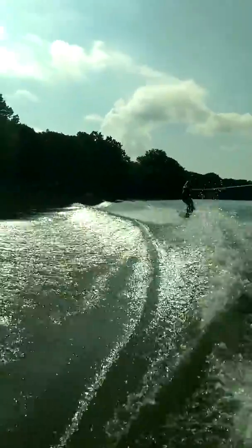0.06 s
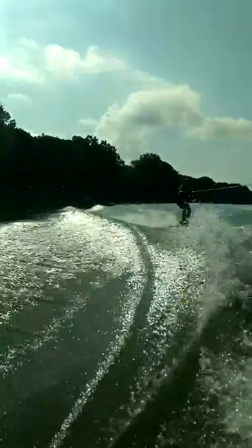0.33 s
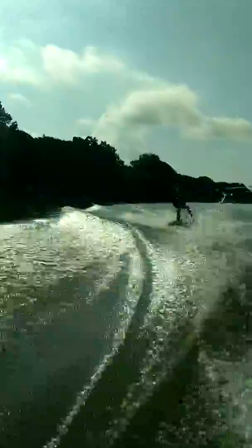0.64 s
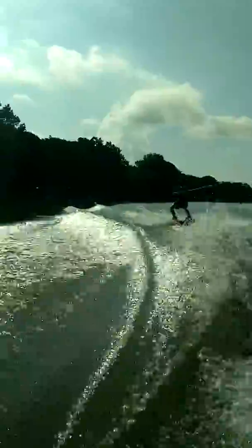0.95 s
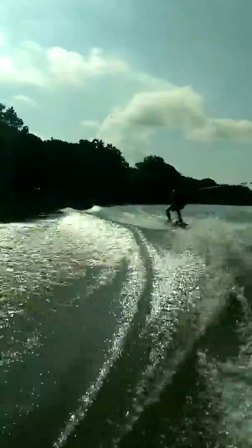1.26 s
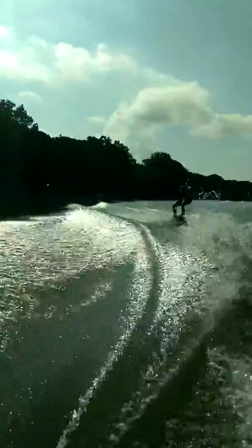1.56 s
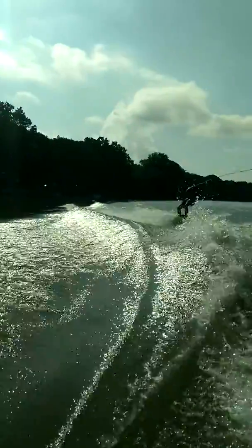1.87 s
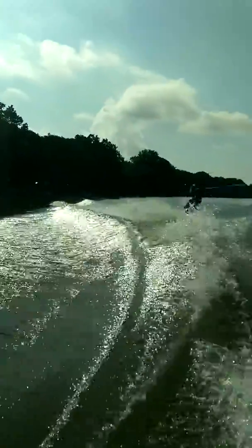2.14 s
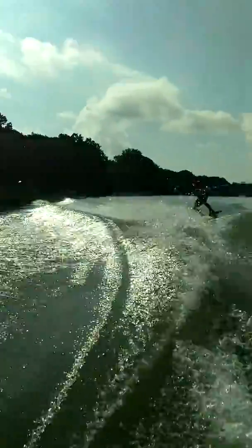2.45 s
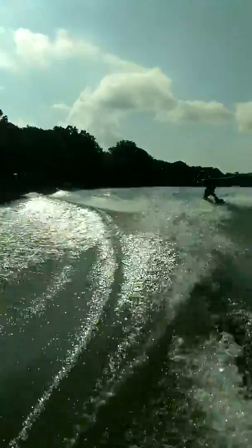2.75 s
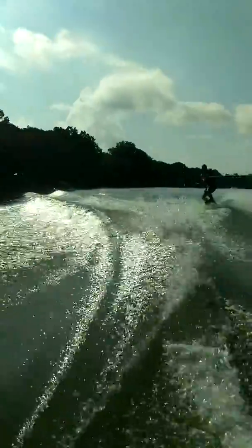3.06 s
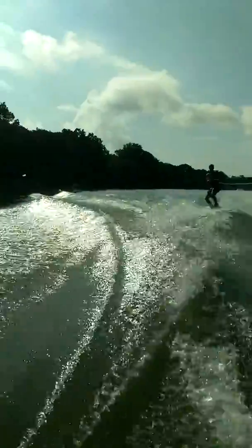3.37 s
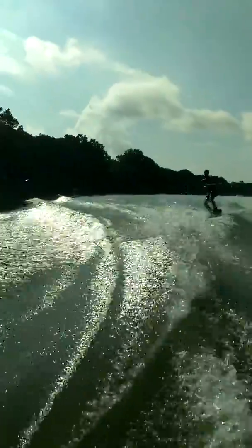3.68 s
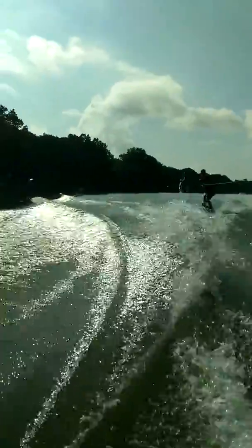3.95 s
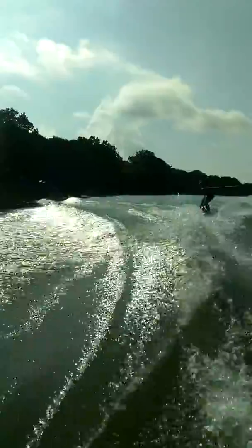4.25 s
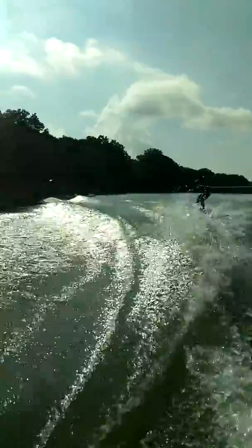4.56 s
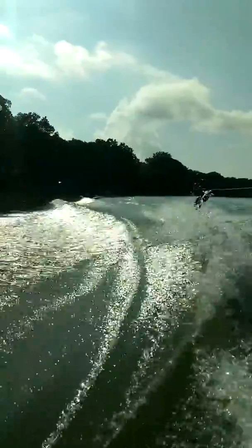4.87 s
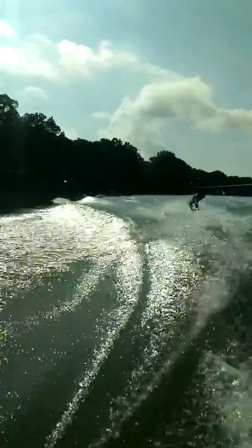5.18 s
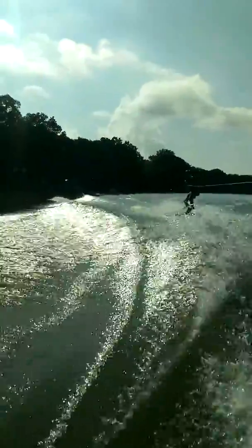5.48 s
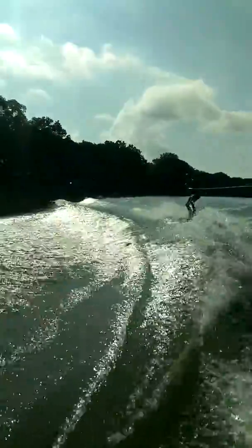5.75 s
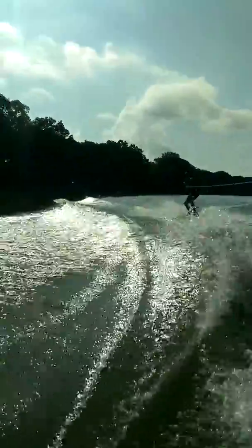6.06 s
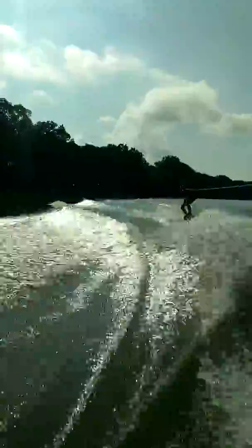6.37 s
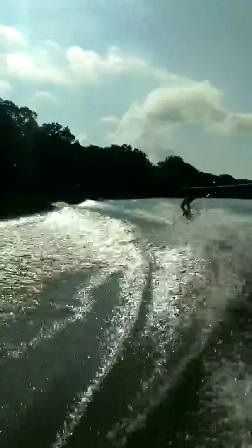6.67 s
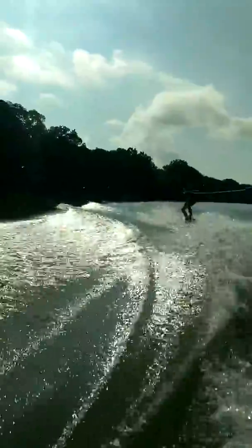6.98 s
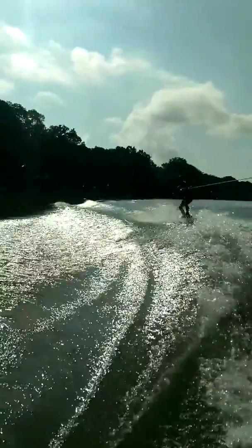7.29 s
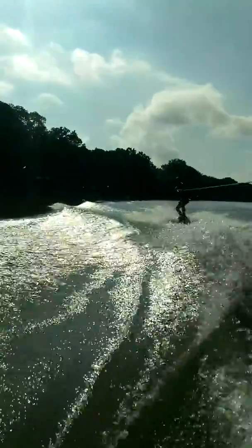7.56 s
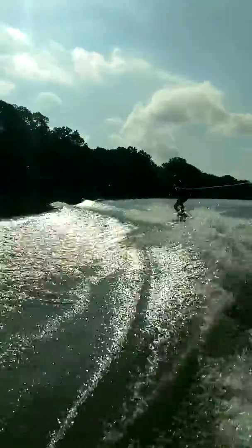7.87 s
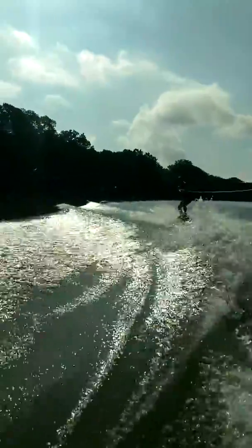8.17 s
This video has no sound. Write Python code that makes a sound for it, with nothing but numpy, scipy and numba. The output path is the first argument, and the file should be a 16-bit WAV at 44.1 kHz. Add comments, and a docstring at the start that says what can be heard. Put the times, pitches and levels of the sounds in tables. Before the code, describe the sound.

Wind buffets the microphone on a moving motorboat, its low engine drone and spraying wake continuing throughout, with a slight late rise in pitch.

```python
"""On the stern of a V8 tow boat crossing a lake. From the start the wet exhaust drones at the firing
rate, the wake churns and sprays, and the drive whines faintly. Wind buffets the microphone, mostly its
right port: eddies rumble and pop, and strong gusts make the limiter duck everything. Just after the
strongest gust, at 6.3 s, the driver adds a little throttle: the drone and whine rise in pitch,
and the spray swells slightly while the engine gathers speed."""
import sys
import numpy as np
from scipy import signal
from scipy.fft import rfft, irfft, next_fast_len
from scipy.io import wavfile
from scipy.ndimage import uniform_filter1d, minimum_filter1d, map_coordinates
from numba import njit

SR = 44100
rng = np.random.default_rng(int(sys.argv[2]) if len(sys.argv) > 2 else 0)


def output_pcm(signal):
    """Save a mono or channel-first signal as 16-bit PCM at the path in sys.argv[1].

    Samples are clipped to [-1, 1] before scaling.
    """
    pcm = np.clip(np.atleast_2d(signal).T, -1, 1) * 32767
    wavfile.write(sys.argv[1], SR, np.round(pcm).astype(np.int16))


N = 367353
T = np.arange(N) / SR

# Crankshaft speed: time_s, turns_per_s
CRANK_SPEED = [(0, 36.8), (1.9, 36.65), (3.8, 36.4), (6.45, 36.37), (6.8, 37.27), (7.1, 37.68),
               (8.33, 37.92)]
# Exhaust tones, relative levels; eight cylinders fire four times a turn: cycles_per_turn, level_db
EXHAUST_ORDERS = [(2, -35.5), (2.5, -37), (3, -47.5), (4, -7), (4.5, -37.5), (5, -37), (5.5, -49),
                  (6, -25.5), (7, -47.5), (7.5, -51), (8, -24.5), (8.5, -54.5), (9, -43), (9.5, -48),
                  (10, -39.5), (11, -49.5), (12, -49.5), (13.5, -55), (14, -58.5), (14.5, -55.5),
                  (15, -57.5), (19.5, -53), (20.5, -57.5)]
# Wind strength about its mean, which sets rumble, rasp and pressure: time_s, strength_db
WIND_STRENGTH = [(0, 0), (0.66, 2.4), (0.95, -1.4), (1.3, 0), (1.9, 2.2), (2.1, -0.7), (2.7, -1.6),
                 (3.45, 2.2), (3.9, -1.1), (4.7, -0.1), (6.1, 0), (6.8, -2), (7.3, -0.5), (8.1, 0.9),
                 (8.3, -1.5)]
# Spectral shape of the turbulence at a port: frequency_hz, density_db
TURBULENCE_SPECTRUM = [(20, -46.5), (30, -46), (45, -38), (70, -32.5), (100, -35), (190, -40), (260, -49),
                       (400, -52.5), (650, -63), (1100, -72), (3000, -101.5)]
# The strongest gusts, relative pressures: centre_s, pressure_db, half_width_s
GUST_PULSES = [(0.535, -5.5, 0.007), (0.678, -6.5, 0.0093), (1.19, -6.5, 0.021), (1.369, -4.5, 0.0076),
               (1.478, -2, 0.01), (1.945, -5, 0.028), (2.389, -0.5, 0.011), (3.408, -9, 0.015),
               (4.046, -0.5, 0.016), (4.6, -5.5, 0.008), (6.087, -7, 0.027), (6.295, 1, 0.0088),
               (7.244, -3.5, 0.015), (7.931, -5, 0.017), (8.183, -5, 0.014)]
# The loudest eddies breaking on the windward port, relative peaks: start_s, level_db, decay_s
EDDY_POPS = [(0.052, -17, 0.004), (0.072, -20.5, 0.005), (0.269, -17, 0.005), (0.312, -20, 0.007),
             (0.391, -14.5, 0.006), (0.503, -18, 0.008), (0.639, -17, 0.004), (1.448, -12.5, 0.004),
             (1.795, -15.5, 0.0062), (1.922, -12, 0.0054), (2.146, -16, 0.0074), (2.319, -17.5, 0.004),
             (2.335, -17, 0.005), (3.345, -16, 0.004), (3.606, -19.5, 0.004), (4.216, -16, 0.003),
             (4.777, -14, 0.0026), (4.862, -18, 0.004), (6.236, -17.5, 0.006), (6.592, -18, 0.003)]
# Spectral shape of the churning wake: frequency_hz, left_density_db, right_density_db
WAKE_SPECTRUM = [(414, -60.5, -55.5), (605, -68.5, -69), (1040, -68, -65.5), (1680, -68, -70),
                 (2220, -69, -70), (2550, -68.5, -75.5), (3200, -71.5, -81), (4400, -74, -77.5),
                 (5300, -76.5, -83), (6600, -80.5, -79), (7760, -85, -85.5), (10400, -86.5, -85.5),
                 (12500, -94, -97.5), (15000, -105, -105)]
# Gear and pump tones, relative levels: cycles_per_turn, level_db
DRIVE_ORDERS = [(23, -48), (30, -60), (46, -57)]

RUMBLE_SLOPE, RASP_SLOPE, PRESSURE_SLOPE = 0.98, 0.78, 2.2  # dB for each dB of wind strength


def exhaust(turns, waver_db=0.05, flutter_db=0.5, burble_db=-25):
    """Firing repeats every two turns, giving harmonics of half the crank rate; the wet pipe resonates."""
    tones = 0
    for order, level_db in EXHAUST_ORDERS:
        spread_db = waver_db if order % 2 == 0 else flutter_db  # even orders are the steadiest
        amplitude = np.sqrt(2) * undb(level_db + spread_db * wander(14))
        tones += amplitude * np.sin(2 * np.pi * order * turns + order)
    burble = resonance(rng.standard_normal(N), 163, 70)  # water washes over the outlet
    burble = resonance(burble, 175, 130)
    return tones * ports(-0.11, 0.4) + undb(burble_db) * unit_rms(burble)


def wind_turbulence(turns, wind_db, buffet_db=1.07, crackle_db=5.0, pulse_depth=0.56):
    """Turbulence rumbles and rasps at each port; air pulsing from the exhaust modulates the rasp."""
    hz, density_db = np.transpose(TURBULENCE_SPECTRUM)
    gust_front_db = 6 * gust_swells(lead_s=0.055, width_s=0.034)  # the rasp flares ahead of a gust
    rumble_db = 0.66 + RUMBLE_SLOPE * wind_db
    rasp_db = -3.3 + RASP_SLOPE * wind_db + gust_front_db
    firing_pulse = 1 + pulse_depth * np.sin(2 * np.pi * 4 * turns)
    channels = []
    for _ in range(2):
        rumble = butterworth(rng.standard_normal(N), 300, "low")
        rasp = butterworth(rng.standard_normal(N), 330, "high")
        spurts = undb(rasp_db + crackle_db * np.minimum(wander(110), 2))
        air = rumble * undb(rumble_db) + rasp * spurts * firing_pulse
        channels.append(colour(air, hz, density_db) * undb(buffet_db * wander(11)))
    return np.array(channels) * ports(-17.5, 0.93)


def gust_swells(lead_s=0, width_s=None):
    """Each gust is a Gaussian pulse of pressure, lead_s early, of its own width unless one is given."""
    pressure = np.zeros(N)
    for centre_s, pressure_db, half_width_s in GUST_PULSES:
        offset = (T - centre_s + lead_s) / (width_s or half_width_s)
        near = np.abs(offset) < 4
        pressure[near] += undb(pressure_db) * np.exp(-.5 * offset[near] ** 2)
    return pressure


def wind_pressure(wind_db, flutter_db=1.5, flutter_hz=20):
    """Dynamic pressure on the ports varies too slowly to hear, but is large enough to work the limiter."""
    push = undb(-15.5 + PRESSURE_SLOPE * wind_db + flutter_db * wander(flutter_hz))
    return (push + gust_swells()) * ports(-6.5, 0)


def eddy_pops(wind_db, band_hz=(340, 820), rattle=0.29, small_per_s=2.5, small_decay_s=0.0026):
    """An eddy breaking on the port is a pressure impulse with a dull, exponentially decaying rattle."""
    t = T[:SR // 25]
    small_db = -23 + RASP_SLOPE * wind_db + 1.2 * rng.standard_normal(N)  # grows with the wind
    small_starts = np.flatnonzero(rng.random(N - len(t)) < small_per_s / SR)
    small_pops = [(T[i], small_db[i], small_decay_s) for i in small_starts]
    pops = np.zeros(N)
    for start_s, level_db, decay_s in list(EDDY_POPS) + small_pops:
        burst = rattle * rng.standard_normal(len(t)) * np.exp(-t / decay_s)
        burst[0] += 2  # the impulse
        pop = butterworth(burst, band_hz, "band")
        start = int(start_s * SR)
        pops[start:start + len(t)] += undb(level_db) * pop / np.abs(pop).max()
    return pops * ports(-18.5, 4.9)


def wake(speed, surge_db=0.2, slosh_db=2.0, crossover_hz=900, wash_db=1, wash_spread_s=0.85):
    """Churning foam is coherent at the two ports; the higher hiss and droplets are incoherent."""
    hz, *sides_db = np.transpose(WAKE_SPECTRUM)
    foam = butterworth(rng.standard_normal(N), crossover_hz, "low") * undb(slosh_db * wander(35))
    channels = []
    for density_db in sides_db:
        spray = unit_rms(rng.standard_normal(N) + droplets(per_s=6000, spread_db=2.4))
        water = foam + butterworth(spray, crossover_hz, "high")
        channels.append(colour(water, hz, density_db))
    # The propeller throws more water while it gathers speed.
    acceleration = uniform_filter1d(np.gradient(speed), size=int(wash_spread_s * SR))
    swell_db = surge_db * wander(18) + wash_db * acceleration / acceleration.max()
    return np.array(channels) * undb(swell_db)


def droplets(per_s, spread_db):
    """Independent impacts make shot noise: dense clicks, most small and a few large, at rms 1."""
    hits = rng.random(N) < per_s / SR
    sizes = undb(spread_db * np.minimum(rng.exponential(size=N), 4))
    return unit_rms(hits * sizes * rng.choice([-1, 1], N))


def drive_whine(turns, speed, load_db=4):
    """Gears and pumps radiate at whole multiples of the crank rate, louder as the throttle opens."""
    throttle = np.sqrt((speed - speed.min()) / np.ptp(speed))
    tones = sum(undb(level_db) * np.sin(2 * np.pi * order * turns) for order, level_db in DRIVE_ORDERS)
    return np.sqrt(2) * tones * undb(load_db * throttle) * ports(-2, 0)


def undb(db):
    """Amplitude grows tenfold for every 20 dB."""
    return 10 ** (np.asarray(db) / 20)


def curve(table):
    """Linear interpolation of a time table at every sample."""
    return np.interp(T, *np.transpose(table))


def unit_rms(x):
    """Normalisation to rms 1."""
    return x / np.sqrt(np.mean(x ** 2))


def ports(left_db, right_db):
    """Gains at the two microphone ports; their level difference places a source."""
    return undb([[left_db], [right_db]])


def wander(knots_per_s):
    """Smooth random modulation of rms 1: a spline through Gaussian values."""
    knots = rng.standard_normal(8192)
    spline = map_coordinates(knots, [T[::16] * knots_per_s], order=3, mode="wrap")
    return unit_rms(spline).repeat(16)[:N]


def colour(x, hz, density_db):
    """Spectral shaping: white noise of rms 1 takes on the given power density."""
    size = next_fast_len(N, real=True)
    bins_hz = np.maximum(np.fft.rfftfreq(size, 1 / SR), 1)
    gain = undb(np.interp(np.log(bins_hz), np.log(hz), density_db)) * np.sqrt(SR / 2)
    return irfft(rfft(x, size) * gain, size)[..., :N]


def resonance(x, centre_hz, width_hz):
    """A damped resonator with gain 1 at its centre."""
    return signal.lfilter(*signal.iirpeak(centre_hz, centre_hz / width_hz, fs=SR), x)


def butterworth(x, edge_hz, kind, order=2):
    """A filter with a maximally flat passband."""
    return signal.sosfilt(signal.butter(order, edge_hz, kind, fs=SR, output="sos"), x)


@njit
def follow_peaks(x, attack, release):
    """Envelope detection: the level rises quickly and relaxes slowly."""
    envelope, level = np.empty(len(x)), 0.
    for i in range(len(x)):
        level += (x[i] - level) * (attack if x[i] > level else release)
        envelope[i] = level
    return envelope


def limiter(x, ceiling, attack_s, release_s):
    """Above the ceiling, one smooth gain for both channels varies inversely with the peak envelope."""
    peak = follow_peaks(np.abs(x).max(axis=0), 1 / (1 + attack_s * SR), 1 / (1 + release_s * SR))
    gain = np.minimum(1, ceiling / (peak + 1e-9))
    return x * uniform_filter1d(minimum_filter1d(gain, size=300), size=300)  # looks a little ahead


def scene():
    """Boat and wind superpose at the two ports; all tones are locked to the rotation of the crank."""
    speed = curve(CRANK_SPEED)
    wind_db = curve(WIND_STRENGTH)
    turns = np.cumsum(speed) / SR
    boat = exhaust(turns) + wake(speed) + drive_whine(turns, speed)
    return boat + wind_turbulence(turns, wind_db) + wind_pressure(wind_db) + eddy_pops(wind_db)


def record(dry, gain_db=0.8, ceiling_db=-0.64, low_cut_hz=31, high_cut_hz=15200):
    """Limiting precedes the low cut, so inaudible gust pressure modulates all the audible sound."""
    ducked = limiter(dry * undb(gain_db), undb(ceiling_db), attack_s=0.00036, release_s=0.038)
    audible = butterworth(ducked, low_cut_hz, "high", order=3)
    limited = limiter(audible, ceiling=0.91, attack_s=0, release_s=0.01)
    steep_low_pass = signal.ellip(8, .2, 70, high_cut_hz, fs=SR, output="sos")
    return signal.sosfilt(steep_low_pass, limited)


dry = scene()
out = record(dry)
output_pcm(out)
```